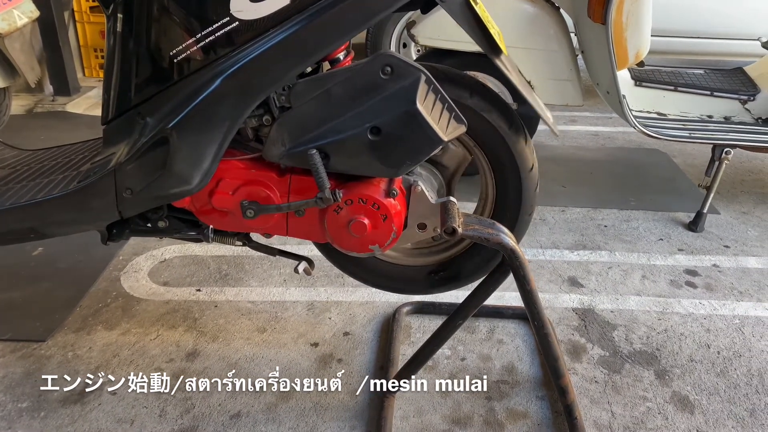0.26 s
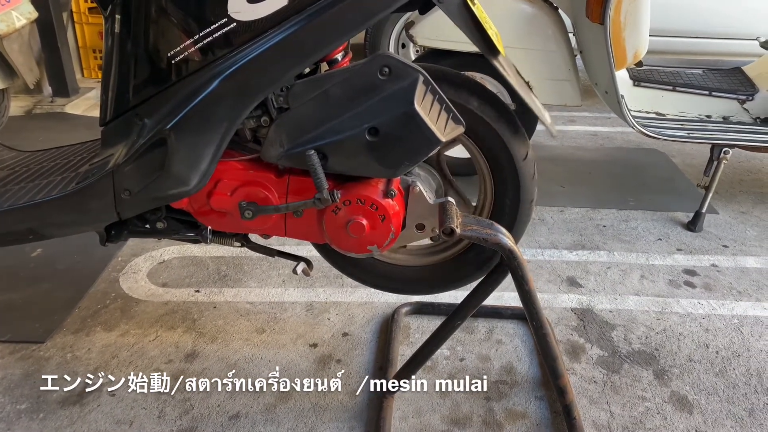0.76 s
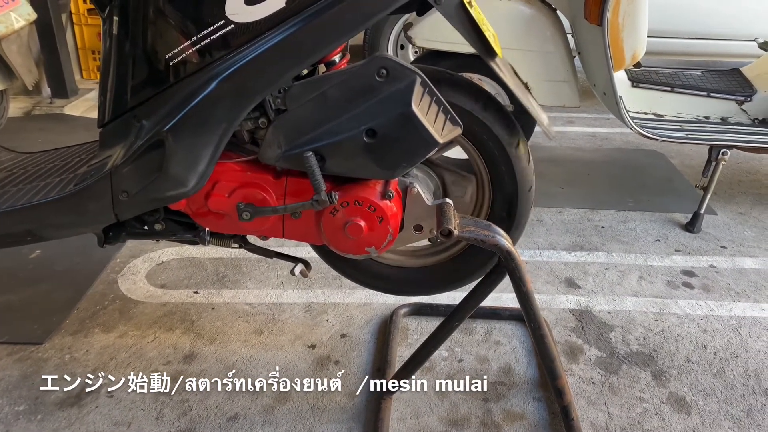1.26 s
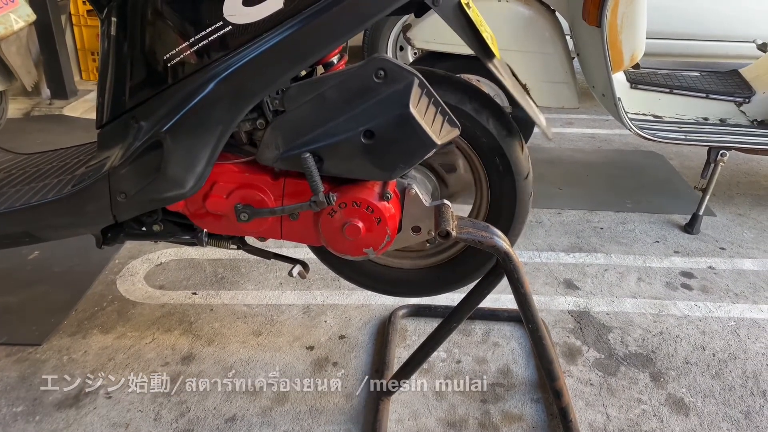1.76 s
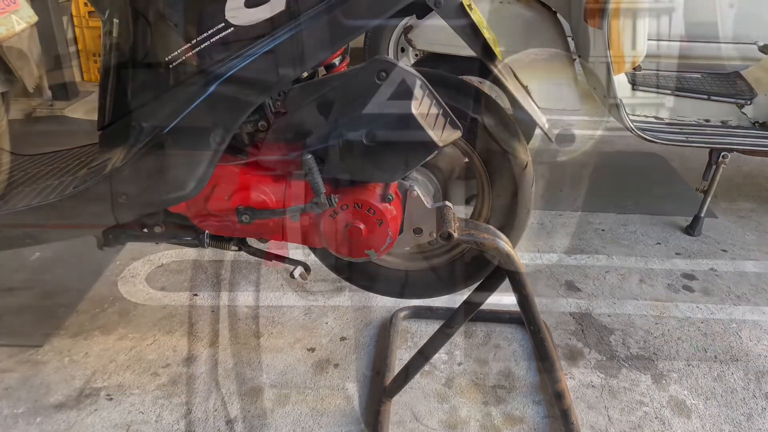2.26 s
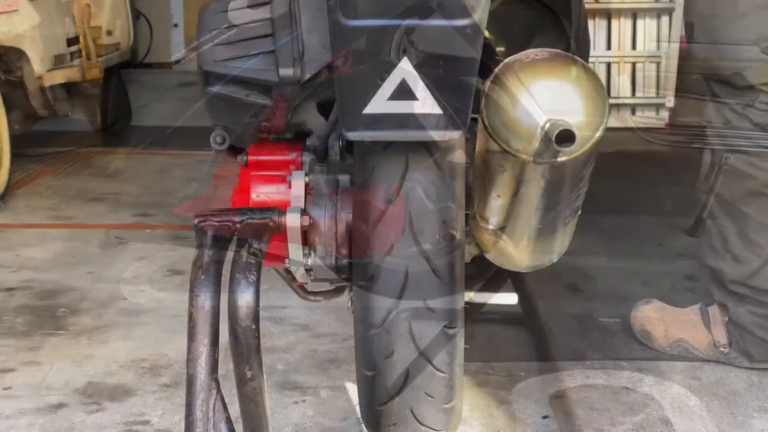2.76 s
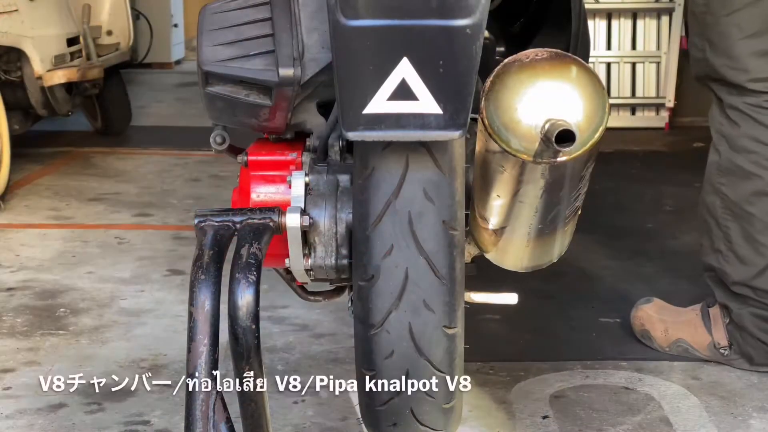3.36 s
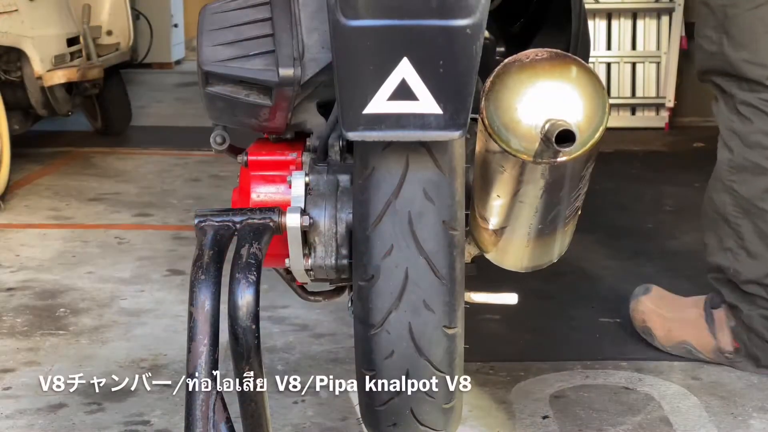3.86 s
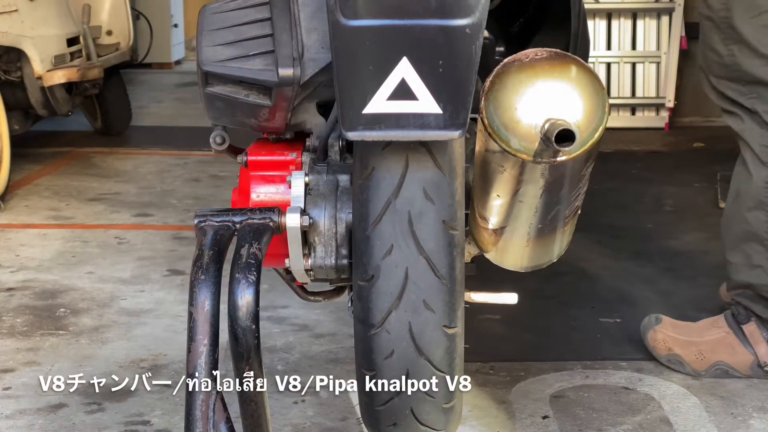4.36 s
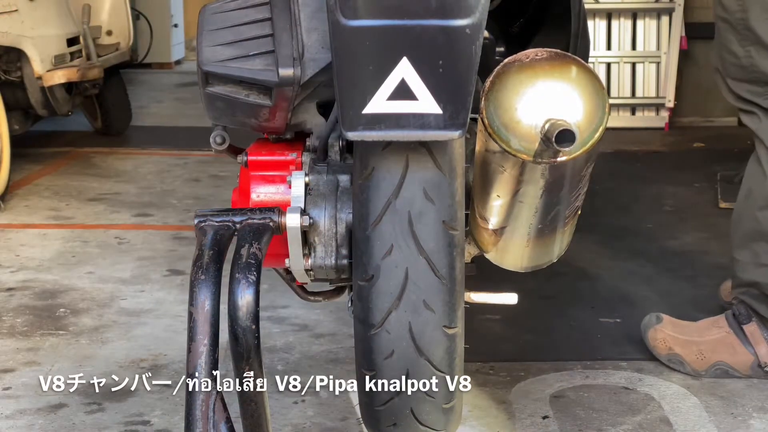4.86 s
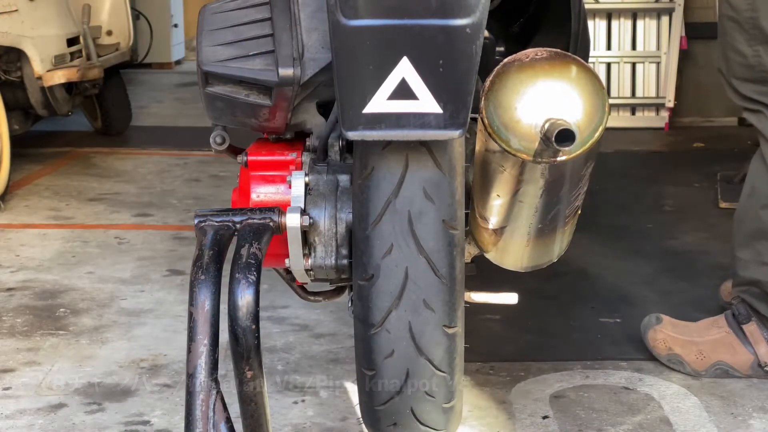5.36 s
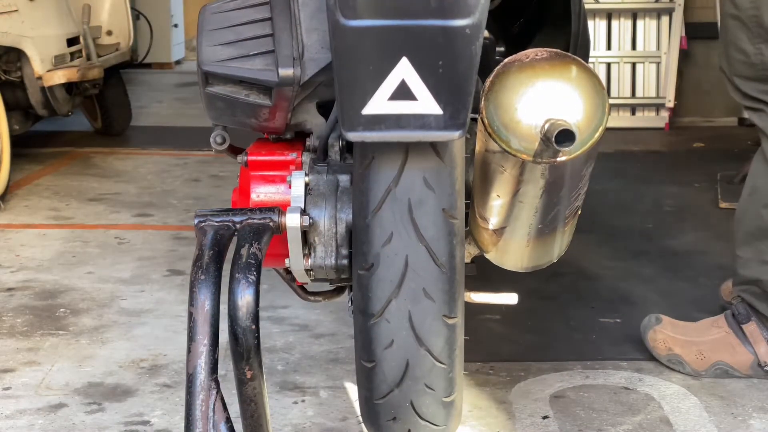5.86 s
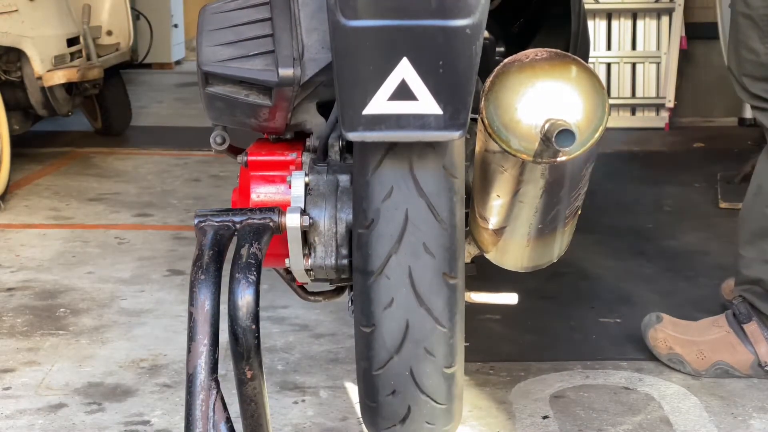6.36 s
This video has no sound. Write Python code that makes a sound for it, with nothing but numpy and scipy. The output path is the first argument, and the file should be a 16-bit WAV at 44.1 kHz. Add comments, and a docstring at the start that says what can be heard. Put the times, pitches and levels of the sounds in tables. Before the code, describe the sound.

A small two-stroke scooter idles with a buzzy rattle, fades out, then after handling clacks the starter clashes, cranks, and the engine is blipped twice.

```python
"""Two-stroke scooter in a garage

Heard from the side, a small scooter idles on its stand, firing every second or third turn; its sound falls away
and the scene changes. Then, from behind the silencer: handling clacks, a starter clashes in and cranks, the
engine is blipped twice. Crank turns pulse a resonant pipe and rattle loose parts; firings add thumps, cracks
and metallic ringing. Solids ring as decaying sine modes, bursts are shaped noise, and gear teeth give a whine
and a chatter."""
import sys
import numpy as np
from scipy import signal
from scipy.fft import rfft, irfft, next_fast_len
from scipy.io import wavfile
from scipy.ndimage import uniform_filter1d

SR = 44100
rng = np.random.default_rng(int(sys.argv[2]) if len(sys.argv) > 2 else 0)


def unload_wav(signal):
    """Save mono or channel-first audio to the path in sys.argv[1] as 16-bit WAV at rate SR, clipped to [-1, 1]."""
    wavfile.write(
        sys.argv[1],
        SR,
        np.round(np.clip(np.atleast_2d(signal).T, -1, 1) * 32767).astype(np.int16),
    )


N = 291942
TIME = np.arange(N) / SR
TAIL = TIME[:SR // 2]  # time axis of one blow's response

# crank speed through the start and two blips: time_s, speed_turns_per_s
REV_SPEED = [(4.565, 6), (4.64, 20.66), (4.848, 22.91), (5.334, 23), (5.562, 32.7), (5.599, 42.8),
             (5.792, 38.82), (5.954, 53.17), (6.126, 44.34), (6.415, 37.48), (6.547, 50.67), (6.62, 50.67)]
# separate bangs as the engine catches and is blipped:
# start_s, crack_db, pipe_thump_db, bark_db, block_ring_db
BANGS = [(4.563, -56, -14, -31, -21.5), (4.639, -50, -15.5, -30, -42), (4.688, -30.5, -12.5, -45, -45),
         (4.779, -26.5, -15.5, -52, -47), (4.867, -33.5, -14, -34, -49), (4.953, -27, -15, -34, -52),
         (5.086, -26.5, -14, -35, -47), (5.219, -31.5, -12.5, -27, -22), (5.345, -27, -16, -29, -48),
         (5.427, -31, -28, -23.5, -26), (5.502, -30, -21, -22, -27), (5.532, -30.5, -38, -21.5, -25),
         (5.561, -30, -18, -18, -19.5), (5.589, -25.5, -29, -17.5, -19), (5.659, -24.5, -21, -17.5, -18),
         (5.734, -20.5, -15, -16, -38), (5.808, -20.5, -13, -18.5, -39), (5.856, -19.5, -34, -15, -18),
         (5.899, -16.5, -25, -18.5, -33), (5.919, -22, -19, -35, -15), (5.959, -20.5, -12, -27, -16.5),
         (6.057, -27.5, -24, -32, -16.5), (6.338, -22.5, -14, -26, -44), (6.416, -22.5, -26, -15.5, -21),
         (6.465, -25, -17, -25, -16), (6.511, -20, -34, -16.5, -17), (6.552, -18, -12, -16, -18),
         (6.572, -20, -25, -35, -27), (6.591, -18.5, -16, -15, -13.5), (6.609, -22, -14, -28, -14)]
# stereo width behind the scooter: frequency_hz, side_minus_mid_db
WIDTH_REAR = [(150, -15), (500, -3.5), (1500, -12.5), (4500, -71), (7000, -53), (9000, -7), (15000, -14)]
# spectrum of contact with the frame: frequency_hz, level_db
KNOCK_COLOUR = [(88, -20), (150, -11.5), (275, -2), (448, -2.5), (871, -5), (1390, -7.5), (1690, -5.5),
                (2760, -8), (3420, -11.5), (11700, -17), (13700, -20.5), (16000, -40)]
# modes of the frame: frequency_hz, t60_s, level_db
FRAME_MODES = [(304, 0.24, -8), (334, 0.32, -7), (464, 0.29, -13), (564, 0.24, -6), (606, 0.26, -7),
               (1030, 0.29, -10.5), (1394, 0.14, -10), (1925, 0.19, -25), (2540, .2, -23), (3331, 0.3, -14),
               (4400, 0.091, -15)]
# modes of the silencer shell: frequency_hz, t60_s, level_db
SILENCER_MODES = [(1335, .05, -7), (1385, .04, -7), (1454, .19, 0), (1474, .08, -5), (1510, .04, -6),
                  (2110, .08, -17)]


def undb(db):
    """Amplitude gain is ten to the power of decibels over twenty."""
    return 10 ** (np.asarray(db) / 20)


def curve(rows, at):
    """Linear interpolation of a table's columns against its first column."""
    x, *columns = np.transpose(rows)
    return [np.interp(at, x, column) for column in columns]


def unit(x):
    """Normalisation to an rms of 1."""
    return x / np.sqrt(np.mean(x ** 2))


def butter(x, hz, kind, order=2):
    """Butterworth filtering: a low-pass or high-pass with a maximally flat passband."""
    sos = signal.butter(order, min(hz, SR / 2 - 1), kind, fs=SR, output="sos")
    return signal.sosfilt(sos, x)


def noise(colour, width):
    """Spectral shaping of white noise; independent mid and side give its stereo width, mid rms 1."""
    size = next_fast_len(N, real=True)
    log_hz = np.log(np.arange(size // 2 + 1) * SR / size + 1)

    def spectrum_gain(table):
        hz, db = np.transpose(table)
        return undb(np.interp(log_hz, np.log(hz), db))

    def shaped(gain):
        return irfft(rfft(rng.standard_normal(size)) * gain, size)[:N]

    # roll off below the lowest frequency of the colour
    gain = spectrum_gain(colour) / np.sqrt(1 + (colour[0][0] / np.exp(log_hz)) ** 4)
    mid, side = shaped(gain), shaped(gain * spectrum_gain(width))
    return np.array([mid + side, mid - side]) / mid.std()


def walk(hz):
    """Band-limited random modulation: low-passed noise with rms 1."""
    return unit(butter(rng.standard_normal(N), hz, "low"))


def impulses(times, sizes):
    """Impulsive excitation: one spike for each blow."""
    at = np.round(np.asarray(times) * SR).astype(int)
    inside = (at >= 0) & (at < N)
    return np.bincount(at[inside], np.asarray(sizes)[inside], N)


def jitter(times, spread_s):
    """Random timing: blows land a little early or late."""
    return times + spread_s * rng.standard_normal(len(times))


def scatter(db, spread_db):
    """Random strength: gains of blows vary normally in decibels."""
    return undb(db + spread_db * rng.standard_normal(len(db)))


def ring(spikes, response):
    """Linear superposition: convolution plays a response at every spike."""
    return signal.fftconvolve(np.atleast_2d(spikes), np.atleast_2d(response), axes=1)[:, :N]


def fade(t60):
    """Exponential decay by 60 dB in t60 seconds."""
    return np.exp(-np.log(1000) * TAIL / t60)


def blow(rise_s, t60, room_db, room_t60):
    """Direct and reverberant decay: their energies add under a common onset."""
    return (1 - np.exp(-TAIL / rise_s)) * np.hypot(fade(t60), undb(room_db) * fade(room_t60))


def energy_envelope(spikes, envelope):
    """Incoherent superposition: the energies of overlapping blows add."""
    return np.sqrt(np.abs(ring(spikes ** 2, envelope ** 2)))


def bursts(spikes, envelope, colour, width, fresh_hz):
    """Repeated and random response: blows sound alike below fresh_hz; above it each gets new noise."""
    alike = butter(noise(colour, width), fresh_hz, "low", order=1)[:, -len(TAIL):] * envelope
    fresh = butter(noise(colour, width), fresh_hz, "high", order=1)
    return ring(spikes, alike) + fresh * energy_envelope(spikes, envelope)


def metal(spikes, modes, lag_s, rise_s=0.00093):
    """Modal superposition: decaying sines build up over rise_s, lag_s later on the right."""
    t = np.maximum(TAIL - np.array([[0], [lag_s]]), 0)
    modal_sum = sum(undb(db) * fade(t60) * np.sin(2 * np.pi * hz * t) for hz, t60, db in modes)
    return ring(spikes, (1 - np.exp(-t / rise_s)) * modal_sum)


def struck(blows, modes):
    """Impact excitation: a table of blows rings one set of modes."""
    s, db = np.transpose(blows)
    return metal(impulses(s, undb(db)), modes, lag_s=.00005)


def buzz(spikes, panels):
    """Narrow-band random vibration: loose panels flutter and never ring twice alike."""
    out = 0
    for hz, width, db, rise_s, t60 in panels:
        envelope = (1 - np.exp(-TAIL / rise_s)) * fade(t60)
        phase = 2 * np.pi * hz * TIME
        tone = walk(width / 2) * np.sin(phase) + walk(width / 2) * np.cos(phase)
        out = out + undb(db) * tone * energy_envelope(spikes, envelope)
    return out


def garage():
    """Amplitude-modulated background noise: a low, unsteady rumble in the garage."""
    # frequency_hz, level_db
    rumble_colour = [(15, -49.5), (25, -26), (38, 2), (59, -7.5), (82, 0), (120, -6), (600, -26),
                     (1330, -35.5), (3000, -43.5), (8360, -54), (11600, -40), (16000, -71)]
    unsteadiness = unit(uniform_filter1d(rng.standard_normal(N), size=6000))
    return noise(rumble_colour, WIDTH_REAR) * undb(-58.5 + 1.2 * unsteadiness)


def scuffing():
    """Stick-slip friction: grainy scrapes of hands and shoes, whose catches ring the frame."""
    # gritty scuffing as the rider takes hold: time_s, level_db
    scuff_level = [(2.9, -91.5), (3.15, -96), (3.22, -74), (3.53, -67), (3.62, -84), (3.74, -73),
                   (3.8, -72), (3.98, -74.5), (4.11, -84.5), (4.2, -81), (4.31, -78), (4.35, -70),
                   (4.45, -76)]
    grain = unit(undb(5 * walk(200)))
    catches = rng.uniform(scuff_level[0][0], scuff_level[-1][0], size=120)
    catch_sizes = scatter(curve(scuff_level, catches)[0] + 3, spread_db=3)
    frame = metal(impulses(catches, catch_sizes), FRAME_MODES, lag_s=.0001)
    scrape_gain = undb(curve(scuff_level, TIME)[0] + 0.5)
    return frame + noise(KNOCK_COLOUR, WIDTH_REAR) * grain * scrape_gain


def thuds():
    """Low-frequency modal response: weight shifts dully on the stand."""
    # shifts of weight: start_s, level_db
    weight_shifts = [(3.548, -51), (3.881, -45)]
    # modes of the stand and floor: frequency_hz, t60_s, level_db
    stand_modes = [(111, 0.11, 3), (190, .06, 1), (435, .05, -6), (950, .08, -10)]
    return struck(weight_shifts, stand_modes)


def knocks():
    """Impact noise and modal ringing: short blows on the frame, their noise with a reverberant tail."""
    # handling clacks, the starter relay's click and, last, the starter pinion clashing in: # start_s, level_db,
    # treble_db, rise_s, frame_ring_db
    frame_blows = [(2.98, -68, 7, 0.0025, -77), (3.271, -25, 3, 0.0052, -35),
                   (3.429, -41.5, -30, 0.006, -59), (3.487, -40.5, -10, 0.0031, -55),
                   (3.525, -53, -6, 0.0056, -68), (3.761, -53, 6, 0.012, -72),
                   (3.877, -42.5, -20, 0.002, -54), (3.953, -57, 10, 0.0017, -74),
                   (4.387, -37, 20, 0.01, -56), (4.41, -7, -2.5, 0.0014, -22)]
    body = noise(KNOCK_COLOUR, WIDTH_REAR)
    dull = butter(body, 1500, "low", order=1)
    treble = body - dull
    out = np.zeros((2, N))
    for s, db, treble_db, rise_s, _ in frame_blows:
        span = slice(int(s * SR), int(s * SR) + len(TAIL))
        burst = (dull + undb(treble_db) * treble)[:, span]
        out[:, span] += burst * undb(db) * blow(rise_s, 0.023, -8.0, 0.3)
    times, *_, ring_db = np.transpose(frame_blows)
    return out + metal(impulses(times, undb(ring_db)), FRAME_MODES, lag_s=.0001, rise_s=.003)


def pinion_clash():
    """Repeated impact: the pinion bounces on the ring gear before it meshes."""
    # bounces: start_s, level_db
    bounces = [(4.411, -19.5), (4.418, -17.5), (4.425, -24)]
    # modes of the transmission case: frequency_hz, t60_s, level_db
    transmission_modes = [(300, 0.099, -2), (484, 0.031, -6), (686, .06, -1.5), (874, 0.064, -2),
                          (1110, 0.042, -14), (1920, 0.072, -20), (2980, .1, -5)]
    return struck(bounces, transmission_modes)


# the starter surges, runs steadily, then is let go and spins down
STARTER_ON_S, STARTER_OFF_S, STARTER_STOP_S = 4.412, 5.11, 5.45


def starter_db(at):
    """Load-dependent level: a surge, a swell at each hard compression, a steady fall once let go."""
    # labouring against the hardest compressions: centre_s, rise_db
    strains = [(4.623, 9), (4.676, 8), (4.718, 6.5), (4.772, 10), (4.814, 9), (4.859, 9), (4.9, 8),
               (4.949, 9), (5.026, 6.5), (5.08, 10.5), (5.122, 8)]
    strain = sum(db * np.exp(-((at - s) / 0.0079) ** 2) for s, db in strains)
    surge = 6.5 * np.exp(-np.maximum(at - STARTER_ON_S, 0) / 0.17)
    spin_down = 54 * np.maximum(at - STARTER_OFF_S, 0)  # dB, at 54 dB per second
    return surge + strain - spin_down - 35


def starter():
    """Gear-mesh vibration: teeth whine at their meshing rate and chatter across their backlash."""
    # gear mesh, which sags at the first compression: time_s, frequency_hz, level_db
    mesh = [(4.41, 900, -38), (4.45, 1600, -35), (4.472, 1760, -31), (4.488, 1880, -35),
            (4.508, 2010, -24.5), (4.525, 1720, -25.5), (4.54, 1390, -28), (4.555, 1300, -31),
            (4.572, 1480, -38), (4.63, 2400, -52), (4.8, 2850, -42), (5.12, 2870, -52), (5.3, 1970, -54)]
    # frequency_hz, level_db
    starter_colour = [(150, -9), (250, -1), (460, -12.5), (971, -11.5), (1420, -9), (2530, -12),
                      (2810, -9.5), (4340, -11.5), (4820, -13.5), (6940, -14), (8550, -17), (11700, -17.5),
                      (13400, -16), (16000, -31)]
    # gear case under the teeth: frequency_hz, width_hz, level_db, rise_s, t60_s
    gear_panels = [(2170, 280, -11.5, 0.00077, 0.18), (2830, 120, -7, .001, 0.099),
                   (3760, 81, -15, .001, 0.055), (4370, 270, -3.5, .001, 0.055),
                   (6930, 260, -8.5, .001, .05)]
    mesh_hz, mesh_db = curve(mesh, TIME)
    wobble, flutter = (unit(uniform_filter1d(rng.standard_normal(N), size=50)) for _ in range(2))
    phase = 2 * np.pi * np.cumsum(mesh_hz * (1 + .075 * wobble)) / SR
    fundamental = np.sin(phase) + .5 * walk(250) * np.cos(phase)
    overtone = undb(-9) * walk(400) * np.sin(2 * phase)
    whine = np.sqrt(2) * (fundamental + overtone) * undb(mesh_db + 3 * flutter)
    # teeth knock about 190 times a second
    taps = jitter(STARTER_ON_S + np.arange(190) / 190, spread_s=.0015)
    teeth = impulses(taps, scatter(starter_db(taps) - 3, spread_db=2.5))
    tap_envelope = blow(0.00037, 0.025, -1.0, 0.15)
    chatter = undb(-1.0) * bursts(teeth, tap_envelope, starter_colour, WIDTH_REAR, fresh_hz=9000)
    case = buzz(teeth, gear_panels)
    shell = undb(-16) * metal(teeth, SILENCER_MODES, lag_s=.00002)
    whirr = noise(starter_colour, WIDTH_REAR) * undb(starter_db(TIME) - 2.5)
    running = (TIME > STARTER_ON_S) * (TIME < STARTER_STOP_S)
    return chatter + case + shell + (whine + whirr) * running


def crank_angle(speed):
    """Integration of rotation speed: times, and the turns completed by then."""
    t = np.arange(speed[0][0], speed[-1][0], 1 / SR)
    return t, np.cumsum(curve(speed, t)[0]) / SR


def crank(speed):
    """Periodic excitation: times at which the crank completes whole turns."""
    t, angle = crank_angle(speed)
    return np.interp(np.arange(int(angle[-1]) + 1), angle, t)


def firings(turns, beat):
    """Subharmonic excitation: only every second or third turn fires."""
    fired, k = [], 0
    while k < len(turns):
        fired.append(turns[k])
        k += [every for s, every in beat if s <= turns[k]][-1]
    return np.array(fired)


def rev_turns():
    """Phase alignment: the crank surges a little so that every bang falls on a turn."""
    t, angle = crank_angle(REV_SPEED)
    at_bangs = np.interp(np.transpose(BANGS)[0], t, angle)
    whole = np.append(0, np.cumsum(np.round(np.diff(at_bangs))))
    turn_angles = np.interp(np.arange(whole[-1] + 1), whole, at_bangs)
    return np.interp(turn_angles, angle, t)


def by_speed(at, slow_db, fast_db):
    """Speed-dependent excitation: a level moves from slow to fast between 21.5 and 28.7 turns per second."""
    return np.interp(curve(REV_SPEED, at)[0], [21.5, 28.7], [slow_db, fast_db])


def exhaust(puffs, thumps, pipe, cut_hz, round_hz, mode_ratio, waver_s):
    """Pipe resonance: pumped air and burnt gas excite the same modes, which a small outlet radiates."""
    out = 0
    for k, (hz, width, puff_db, thump_db) in enumerate(pipe):
        # a negative ratio makes neighbouring resonances swing opposite ways
        mode = mode_ratio ** k * np.exp(-np.pi * width * TAIL) * np.sin(2 * np.pi * hz * TAIL)
        out = out + ring(undb(puff_db) * puffs + undb(thump_db) * thumps, mode)[0]
    waver = unit(butter(rng.standard_normal(N), 24.0, "low", order=4))
    out = np.interp(TIME + waver_s * waver, TIME, out)  # uneven gas flow bends the pipe's note
    # the garage booms after the pipe
    walls = rng.standard_normal((2, len(TAIL))) * fade(0.44)
    out = out + undb(-19) * ring(out, unit(walls) / np.sqrt(len(TAIL)))
    out = butter(out, round_hz, "low")  # the port opens gradually, which rounds each puff
    # the small outlet radiates little deep bass
    return butter(butter(out, cut_hz, "high"), 28, "high")


def outlet(barks):
    """Pulse radiation: a steep pressure wave rings the chambers and drags turbulence along."""
    # turbulence: frequency_hz, level_db
    turbulence_colour = [(250, 15.5), (420, -11), (750, 4.5), (1050, -14), (1350, 9.5), (2000, -17),
                         (6000, -35), (16000, -55)]
    # modes of the silencer's chambers: frequency_hz, t60_s, level_db
    chamber_modes = [(325, 0.15, -7), (582, 0.18, -17.5), (655, 0.15, -18), (784, 0.11, -9),
                     (970, 0.017, -6), (1344, 0.031, 0.5)]
    blast_s = 0.002  # time from onset to peak
    pulse = TAIL / blast_s * np.exp(1 - TAIL / blast_s)
    blast = butter(ring(barks, undb(10) * pulse), 170, "high", order=1)
    flow = energy_envelope(barks, blow(0.0016, 0.033, -2.0, 0.36))
    turbulence = noise(turbulence_colour, WIDTH_REAR) * undb(-4.5) * flow
    chambers = metal(barks, chamber_modes, lag_s=0.000051) * undb([[1.2], [-1.2]])
    return blast + chambers + turbulence


def idling():
    """Periodic excitation from the side: every second or third turn fires, sagging to a stumble."""
    # crank speed: time_s, speed_turns_per_s
    idle_speed = [(-.046, 31.55), (.594, 31.47), (1.26, 32.34), (2.267, 29.22), (2.9, 29.84)]
    # every third turn fires, until the idle sags and stumbles: from_s, turns_per_firing
    idle_beat = [(-.1, 3), (2.1, 2), (2.25, 3), (2.45, 2), (2.6, 3), (2.7, 2)]
    # the idle's level falls away before the scene changes: time_s, level_db
    idle_fade = [(0, 0), (1.35, .5), (2.15, -2.5), (2.35, -6), (2.65, -10.5), (2.9, -23.5)]
    # exhaust resonances: frequency_hz, width_hz, every_turn_db, firing_db
    side_pipe = [(85.2, 16.7, 7.5, 9.5), (110.3, 19.5, 2, 6.5), (151.9, 12, -8, -0.5),
                 (169.7, 30.5, -4.5, -23), (220.3, 12.8, -11.5, -8.5)]
    # stereo width: frequency_hz, side_minus_mid_db
    side_width = [(200, -23.5), (380, -8.5), (1300, -0.5), (2400, 1), (7000, -1), (10000, 1.5),
                  (15000, -30)]
    # spectra: frequency_hz, level_db
    clatter_colour = [(150, 14.5), (250, 4), (360, -4), (1310, -6), (1910, -10.5), (2090, -6),
                      (3170, -16.5), (4820, -17.5), (8550, -30.5), (11100, -43.5), (12500, -37.5),
                      (13700, -61.5), (15200, -36), (16000, -69.5)]
    crack_colour = [(250, 7.5), (700, 5.5), (1400, 4), (2400, -16), (3400, -5), (6000, -7.5), (7300, -5.5),
                    (8400, -15), (10000, -5.5), (12000, -4), (13500, -8), (16000, -22)]
    # modes of the cases: frequency_hz, t60_s, level_db
    case_modes = [(500, 0.012, -2), (601, 0.0097, -7), (790, 0.02, 3), (1025, 0.022, -2), (1186, 0.0075, 8),
                  (1340, 0.048, 0), (1430, 0.091, -6)]
    # thin covers that buzz on after firing: frequency_hz, width_hz, level_db, rise_s, t60_s
    cover_panels = [(523.3, 350, -9, 0.0026, 0.17), (1365, 150, 2, 0.0038, 0.068),
                    (2083, 79, -10.5, 0.007, 0.42), (2895, 81, -6.5, 0.007, 0.15)]
    # the cases knock as the idle stumbles: start_s, level_db
    stumbles = [(2.153, -20), (2.289, -28), (2.392, -25)]
    crack_db, ring_db = -26.5, -26.5
    steady_turns = crank(idle_speed)
    fired = firings(steady_turns, idle_beat)
    turns = jitter(steady_turns, spread_s=.0004)
    turn_db, fired_db = curve(idle_fade, turns)[0], curve(idle_fade, fired)[0]
    puff = scatter(turn_db - 19, spread_db=1)
    slap = scatter(turn_db - 31, spread_db=1.2)
    # as the level falls away, the crack falls faster than the whole and the ring slower
    bang = scatter(crack_db + 1.27 * fired_db, spread_db=.7)
    knock = scatter(ring_db + 0.69 * fired_db, spread_db=1.8)

    # every turn pulses the pipe, opposite in sign to a firing
    puffs = -impulses(turns, puff)
    thumps = impulses(fired + 0.00049, undb(fired_db - 16))
    pipe = exhaust(puffs, thumps, side_pipe, cut_hz=126.5, round_hz=260, mode_ratio=-1.05, waver_s=.0003)
    pipe = pipe * undb([[.5], [-.5]])
    # the piston slaps at both ends of its stroke
    late_slaps = impulses(jitter(turns + 0.018, spread_s=0.00051), slap * undb(3.5))
    slaps = impulses(turns + .004, slap) + late_slaps
    slap_envelope = blow(0.0015, 0.014, -0.77, 0.21)
    clatter = undb(0.5) * bursts(slaps, slap_envelope, clatter_colour, side_width, fresh_hz=1810)
    # the engine is already running: an earlier crack is still dying away at the start
    cracks = impulses(fired - .0025, bang) + impulses([0], undb([crack_db - 5]))
    crack = bursts(cracks, blow(0.0034, 0.062, -3, 0.33), crack_colour, side_width, fresh_hz=4400)
    # the cases take the firing twice: at the pressure peak and as the port opens
    peaks = impulses(fired + 0.00032, knock * undb(-5.5))
    openings = impulses(jitter(fired + 0.011, spread_s=0.00055), knock * undb(-2.0))
    strikes = peaks + openings + impulses(turns, slap * undb(3.0))
    cases = metal(strikes, case_modes, lag_s=.0001, rise_s=0.00074)
    covers = buzz(impulses(fired, undb(ring_db + fired_db)), cover_panels)
    closing = np.clip((2.92 - TIME) / 0.052, 0, 1)  # silent from 2.92 s
    return (pipe + clatter + crack + cases + covers + struck(stumbles, case_modes)) * closing


def revving():
    """Speed-dependent excitation from behind: cranking, uneven firings, then two blips."""
    # exhaust resonances: frequency_hz, width_hz, every_turn_db, firing_db
    rear_pipe = [(88.1, 17.7, 9.5, -37), (132.1, 10.9, 5, 3.5), (155, 10.8, 0.5, -1), (230, 12, -15, -36),
                 (282, 30, -28, -6)]
    # air that each turn pumps into the pipe: time_s, level_db
    puff_level = [(4.56, -25.5), (5.27, -23.5), (5.39, -14.5), (5.5, -20.5), (5.72, -28), (5.85, -13.5),
                  (5.96, -34), (6.06, -23), (6.2, -30.5), (6.33, -21), (6.52, -15), (6.62, -30)]
    # spectra: frequency_hz, level_db
    clatter_colour = [(150, 8), (250, 6), (414, -7), (640, -2), (1140, -9), (1450, -10), (1760, -9),
                      (4260, -14), (5350, -21.5), (7310, -23), (8400, -24.5), (11500, -25), (13400, -30),
                      (16000, -44)]
    crack_colour = [(250, -26), (700, 6), (1100, -9), (2200, -7), (3300, -3.5), (4400, -1.5), (6200, -5.5),
                    (7300, -8.5), (8500, -1.5), (10500, -5.5), (12000, -1.5), (13500, -4.5), (16000, -19)]
    # modes of the block: frequency_hz, t60_s, level_db
    block_modes = [(1778, .12, -6), (2450, .08, -5), (2720, .06, -6), (2880, .05, -3), (3176, .1, 0),
                   (4007, .1, -2), (4236, .07, 2), (4389, .06, 1), (4535, .06, 4), (4686, .08, 2),
                   (5597, .08, -1), (7220, .04, 2)]
    # the silencer's skin: frequency_hz, width_hz, level_db, rise_s, t60_s
    skin_panels = [(3100, 230, -26.5, .002, 0.15), (4510, 370, -13.5, 0.0038, 0.27),
                   (7200, 200, -12.5, 0.0024, 0.21)]
    # the silencer shell's hardest pings against its mount: start_s, level_db
    pings = [(5.353, -25), (5.44, -25.5), (5.545, -24), (5.735, -21), (5.78, -24), (5.822, -20),
             (5.871, -28), (6.01, -49), (6.147, -18), (6.343, -14.5), (6.431, -22), (6.475, -22.5),
             (6.527, -22)]
    turns = rev_turns()
    fired, crack_db, thump_db, bark_db, block_db = np.transpose(BANGS)
    opened, loose = jitter(turns, spread_s=.0003), jitter(turns, spread_s=.0006)

    puffs = impulses(opened + 0.0055, scatter(curve(puff_level, turns)[0], spread_db=1.5))
    thumps = impulses(fired + 0.0043, undb(thump_db))
    # the gas flow is more ragged than at idle
    pipe = exhaust(puffs, thumps, rear_pipe, cut_hz=123.0, round_hz=232, mode_ratio=0.88, waver_s=.0005)
    pipe = pipe * undb([[.4], [-.4]])
    # loose parts answer each turn unevenly and rattle harder with speed
    slap = scatter(by_speed(turns, slow_db=-38, fast_db=-26), spread_db=2.5)
    slaps = impulses(loose + 0.00312, slap)
    rattle = blow(.0012, .04, -5, .22)
    clatter = undb(8) * bursts(slaps, rattle, clatter_colour, WIDTH_REAR, fresh_hz=2450)
    cracks = impulses(fired - .001, undb(crack_db))
    crack = bursts(cracks, blow(0.0043, 0.18, 0.5, 0.18), crack_colour, WIDTH_REAR, fresh_hz=7000)
    # the pressure wave reaches the outlet after a short delay
    bark = outlet(impulses(fired + 0.003856, undb(bark_db)))
    block_strikes = impulses(fired + 0.000997, undb(block_db))
    block = undb(-12.0) * metal(block_strikes, block_modes, lag_s=.00001)
    skin = buzz(impulses(fired + .001, undb(crack_db)), skin_panels)
    # the silencer shell, too, is shaken harder with speed
    pinged, ping_db = np.transpose(pings)
    shaken = scatter(by_speed(turns, slow_db=-35, fast_db=-30), spread_db=1.5)
    strikes = impulses(pinged, undb(ping_db)) + impulses(loose, shaken)
    shell = metal(strikes, SILENCER_MODES, lag_s=.00002, rise_s=0.0024)
    return pipe + (clatter + bark) * undb([[.7], [-.7]]) + crack + block + skin + shell


def scene():
    """Superposition of sources: background, handling, starter, idle, then the start and the blips."""
    handling = scuffing() + thuds() + knocks()
    return garage() + handling + pinion_clash() + starter() + idling() + revving()


def record(dry):
    """Phase shift and saturation: two ports differ in the high treble, peaks are rounded, the top cut."""
    # the microphone ports are out of step: frequency_hz, left_lead_rad
    port_phase = [(7750, 0), (8270, 2.1), (9040, 2), (10400, .1), (11600, -.2), (13000, -3), (14200, -3.5),
                  (15200, -6.3)]
    size = next_fast_len(N + len(TAIL), real=True)
    lead = curve(port_phase, np.arange(size // 2 + 1) * SR / size)[0]
    shift = np.exp(1j * np.array([lead, -lead]) / 2)
    ports = irfft(rfft(dry, size) * shift, size)[:, :N]
    rounded = np.tanh(0.62 * ports) / 0.62
    top_cut = signal.ellip(8, .2, 70, 16000, fs=SR, output="sos")
    return signal.sosfilt(top_cut, rounded)


dry = scene()
out = record(dry)
unload_wav(out)
```